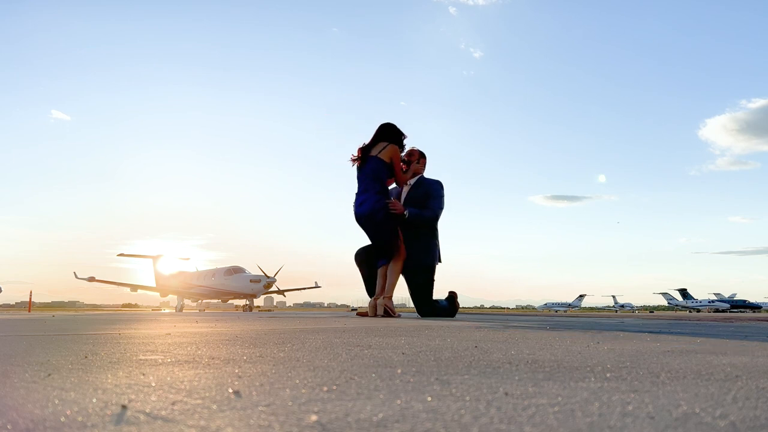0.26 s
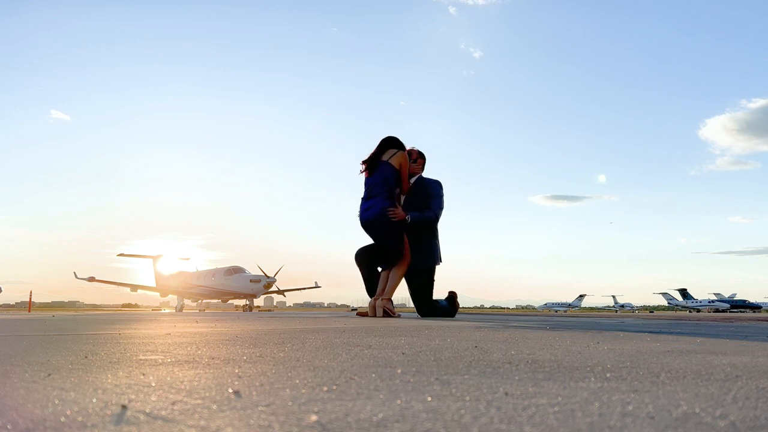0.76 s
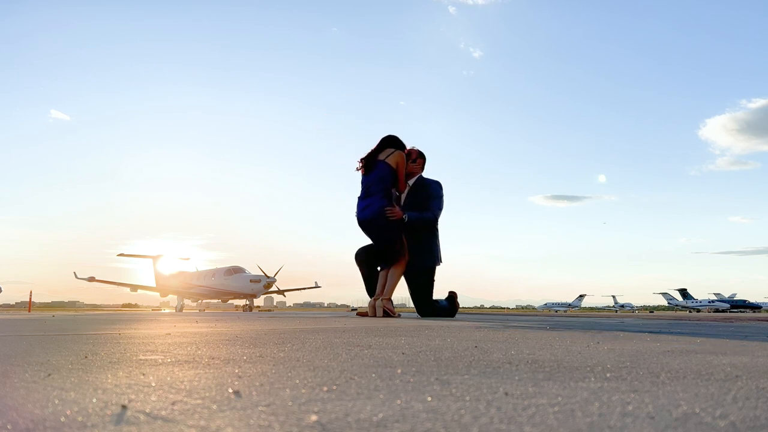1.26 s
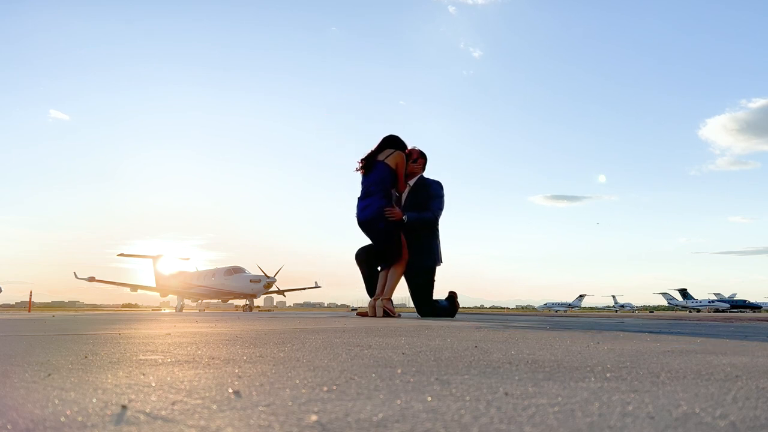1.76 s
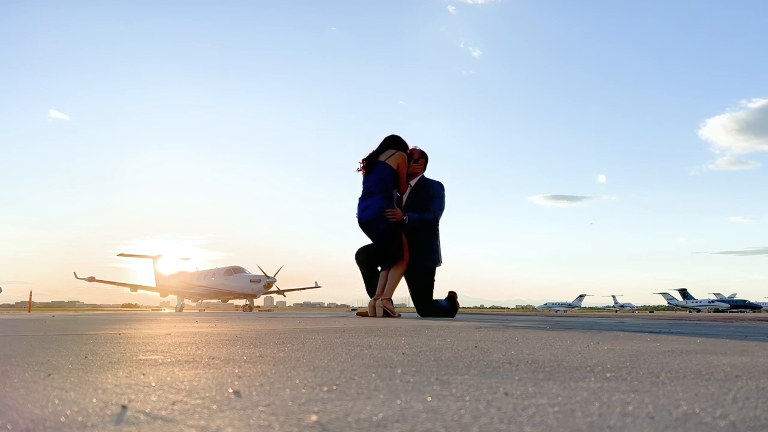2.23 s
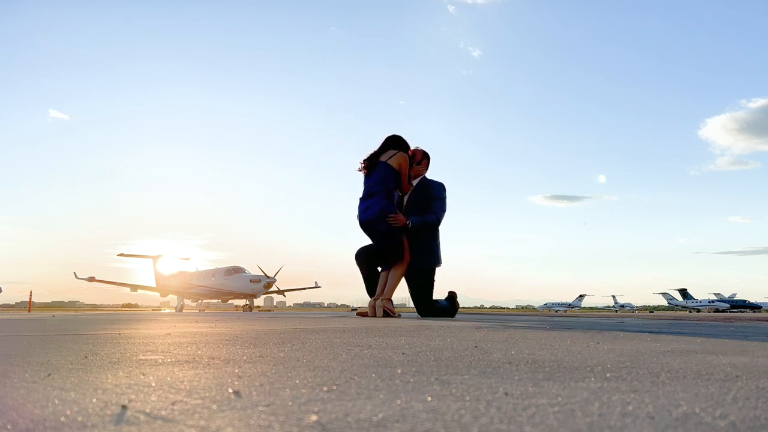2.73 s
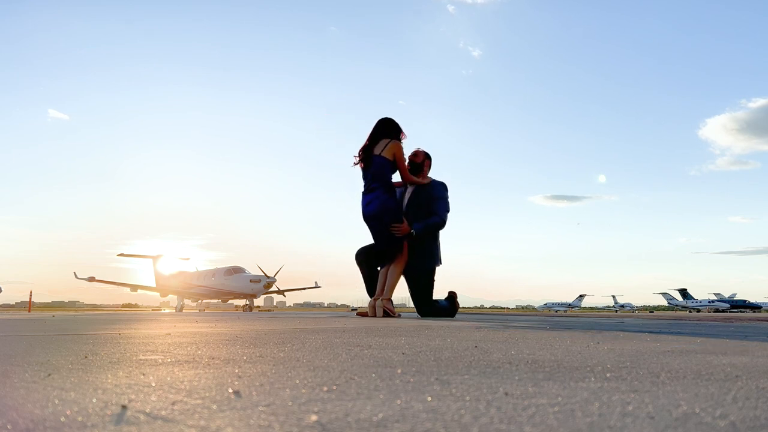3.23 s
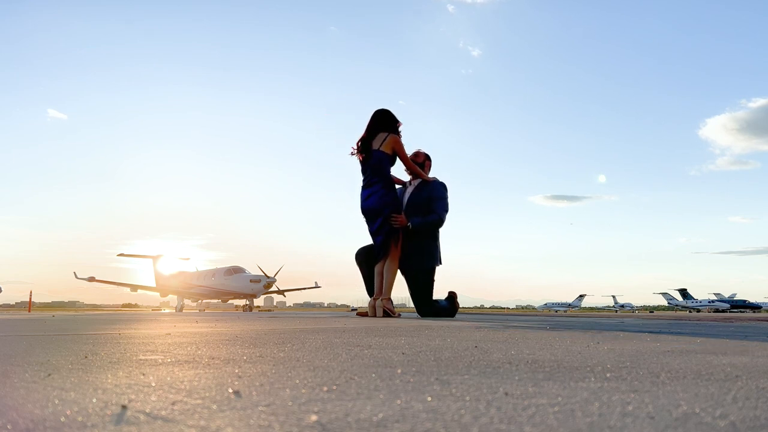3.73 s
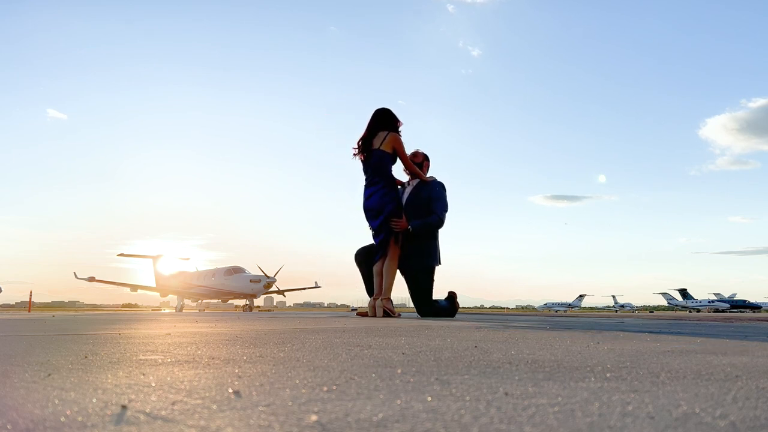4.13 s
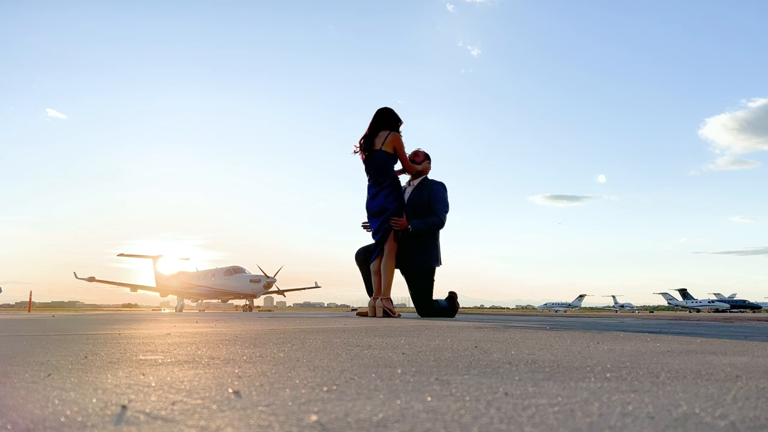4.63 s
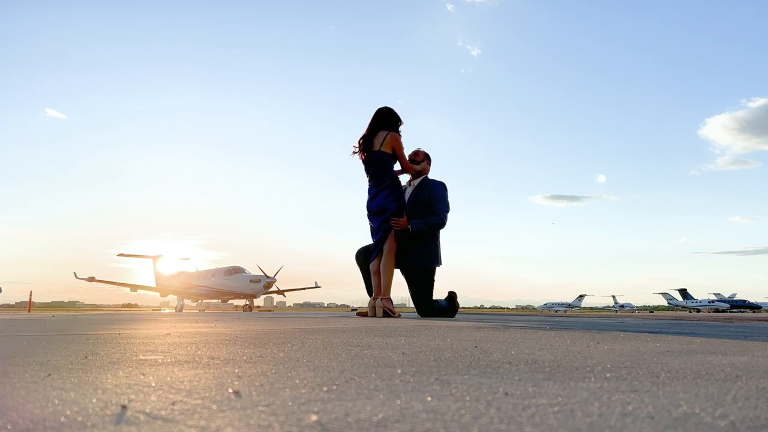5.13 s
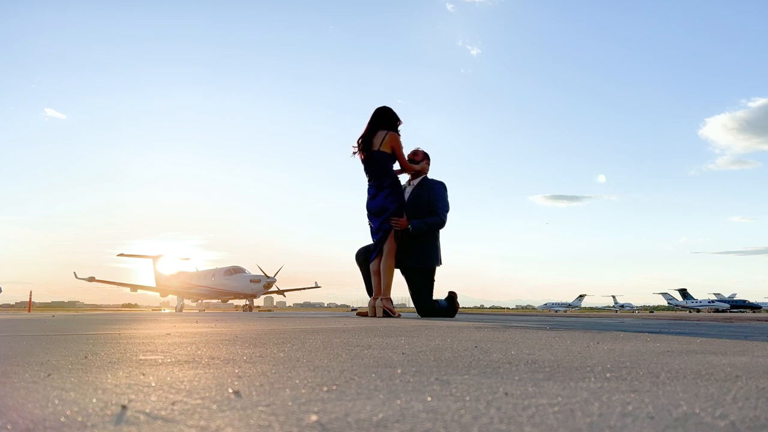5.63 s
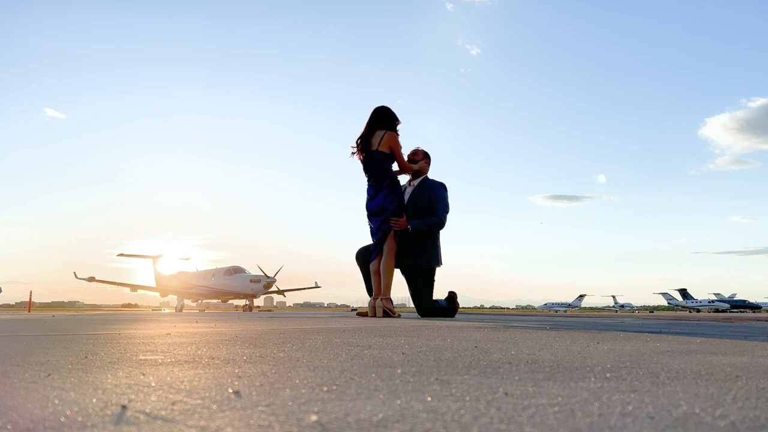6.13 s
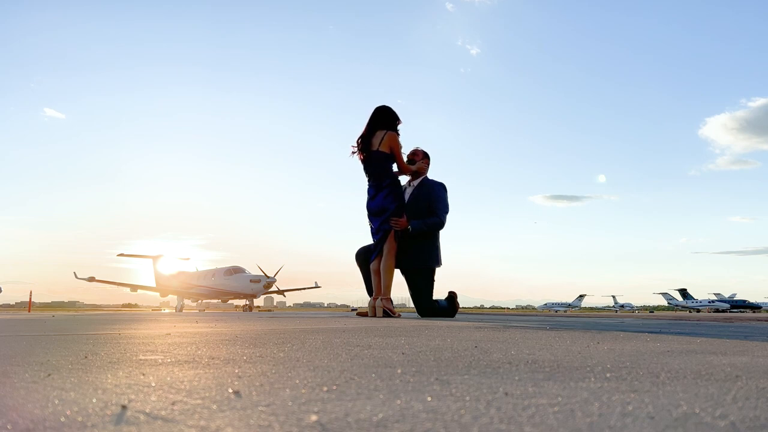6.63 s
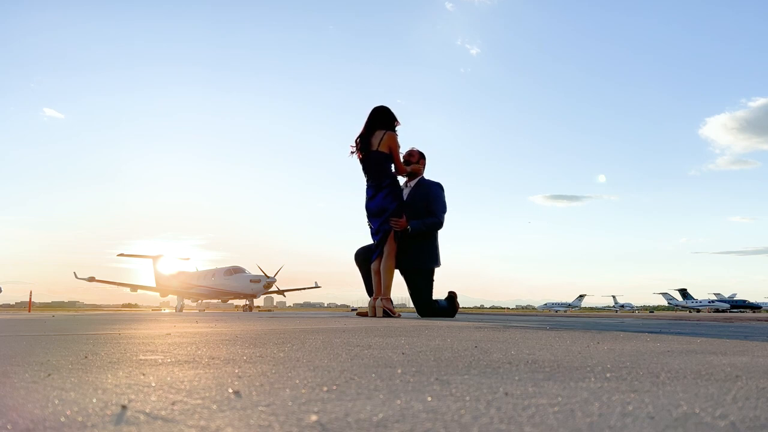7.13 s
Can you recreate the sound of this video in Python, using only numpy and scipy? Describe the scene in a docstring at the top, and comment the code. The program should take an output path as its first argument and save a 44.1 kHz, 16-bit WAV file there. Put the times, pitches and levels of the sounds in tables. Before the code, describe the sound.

A low pulsing drone of idling aircraft propellers on an open apron, with soft ticking, a faint bird and a couple kissing quietly.

```python
"""Propellers beating on an open apron

Two aircraft propellers idle; their blade rates drift apart, so the drone beats ever faster.
Under them lie turbulent exhaust roar and faint whines. A small bird chips, and a soft dry ticking
(perhaps a camera shutter in a burst) runs for two seconds. Close by, a couple kiss, clothes rustle
and shoes scuff, all as noise through resonances; wind bumps the ports, the recorder is nudged and knocked."""
import sys
import numpy as np
from scipy import signal
from scipy.fft import rfft, irfft, next_fast_len
from scipy.io import wavfile
from scipy.ndimage import uniform_filter1d, map_coordinates

SR = 44100
rng = np.random.default_rng(int(sys.argv[2]) if len(sys.argv) > 2 else 0)


def wav_record(signal):
    """Record a signal, one row per channel, as 16-bit PCM in the file named by sys.argv[1]."""
    frames = np.transpose(np.atleast_2d(signal))
    bounded = np.clip(frames, -1, 1)
    # unit amplitude maps onto the largest positive 16-bit level
    quanta = np.round(bounded * 32767).astype(np.int16)
    wavfile.write(sys.argv[1], SR, quanta)


N = 325899
T = np.arange(N) / SR
NEAR_LAG_S = .00026  # delay between the microphone's ports for lips and clothes


def undb(db):
    """Decibels to amplitude ratio."""
    return 10 ** (np.asarray(db) / 20)


def unit(x):
    """Normalisation to rms 1."""
    return x / np.sqrt(np.mean(x ** 2) + 1e-20)


def walk(rate_hz):
    """A smooth random process of rms 1: held random steps, averaged twice."""
    hold = max(int(SR / rate_hz), 2)
    steps = np.repeat(rng.standard_normal(N // hold + 1), hold)
    return unit(uniform_filter1d(uniform_filter1d(steps, hold), hold)[:N])


def curve(points):
    """Linear interpolation of rows (time [s], value, ...): one control for each value column."""
    times, *columns = np.transpose(points)
    return [np.interp(T, times, column) for column in columns]


def band(x, hz, width_hz):
    """A second-order resonance with gain 1 at its centre."""
    hz = min(hz, .44 * SR)
    return signal.lfilter(*signal.iirpeak(hz, hz / min(width_hz, SR / 3), fs=SR), x)


def dull(x, hz):
    """A fourth-order low-pass rolls off the treble."""
    return signal.sosfilt(signal.butter(4, min(hz, .44 * SR), fs=SR, output="sos"), x)


def colour(x, points):
    """Spectral shaping by rows (frequency [Hz], gain [dB])."""
    hz, db = np.transpose(points)
    size = next_fast_len(N + SR // 10)
    bins_hz = np.arange(size // 2 + 1) * SR / size + 1
    gain = undb(np.interp(np.log(bins_hz), np.log(hz), db))
    return irfft(rfft(x, size) * gain, size)[..., :N]


def coloured(points):
    """Gaussian noise of rms 1 with a shaped spectrum."""
    return unit(colour(rng.standard_normal(N), points))


def ports(x, pan_db, lag_s=.00034):
    """Direction as level and time differences: the left port is pan_db louder and lag_s later."""
    late = map_coordinates(x, [np.arange(len(x)) - lag_s * SR], order=3)
    return np.array([late * undb(pan_db / 2), x * undb(-pan_db / 2)])


def add(out, s, x):
    """Superposition of a short sound at time s."""
    i = int(s * SR)
    x = x[..., max(-i, 0):max(N - i, 0)]
    out[..., max(i, 0):max(i, 0) + x.shape[-1]] += x


def grains(length_s, spread_db, skew):
    """Friction noise: grains of uneven size under a swell that peaks early when skew is below 1."""
    progress = np.linspace(0, 1, int(np.clip(length_s, .01, 1) * SR))
    sizes = undb(spread_db * np.repeat(np.minimum(rng.exponential(size=SR // 20), 5), 20))
    return (rng.standard_normal(SR) * sizes)[:len(progress)] * np.sin(np.pi * progress ** skew)


def narrowband(points, spread_hz):
    """Random modulation in quadrature smears a gliding tone into a narrow band."""
    hz, db = curve(points)
    phase = 2 * np.pi * np.cumsum(hz) / SR
    return ports(undb(db) * (walk(spread_hz) * np.cos(phase) + walk(spread_hz) * np.sin(phase)), 0)


# a distant whine, and the thin one of a turbine: (time [s], frequency [Hz], level [dB])
DISTANT_WHINE = [(0, 493.3, -66), (.4, 504, -55.5), (.85, 521, -54.5), (1.4, 497, -61.5),
                 (2.5, 498.4, -66.5), (3.5, 491, -82)]
TURBINE_WHINE = [(0, 9770, -104), (2.5, 9570, -96), (7.39, 9600, -96)]
def whines():
    """Narrow-band noise is heard as pitch: a low whine swells and sinks, a turbine holds a high one."""
    return narrowband(DISTANT_WHINE, spread_hz=100) + narrowband(TURBINE_WHINE, spread_hz=260)


# two thin high swishes: (time [s], centre [Hz], level [dB])
SWISH_PATH = [(2.2, 11020, -115), (2.28, 11200, -85), (2.36, 12260, -83), (2.41, 11900, -83),
              (2.48, 13060, -89), (2.56, 11180, -85), (2.7, 11700, -87), (2.85, 11330, -115),
              (3.7, 11260, -115), (3.77, 11550, -88), (3.85, 12180, -82.5), (3.92, 10980, -84),
              (3.97, 11480, -79), (4.03, 11440, -115)]
def swishes():
    """Wide random modulation blurs a high tone into a hiss."""
    return narrowband(SWISH_PATH, spread_hz=2200)


# spectra of the direct roar and of the scattered roar and hiss: (frequency [Hz], relative density [dB])
DIRECT_SPECTRUM = [(20, -26), (40, -2.5), (60, 6.5), (110, 6), (170, -1.5), (260, -9.5), (400, -14.5),
                   (600, -20), (900, -17.5), (1300, -25.5), (2000, -46), (3300, -55), (6000, -54),
                   (15000, -67)]
DIFFUSE_SPECTRUM = [(20, -14), (60, -5), (150, 0.5), (300, -2), (500, -6.5), (900, -14), (1400, -28),
                    (2200, -42), (3300, -42), (5000, -45), (8000, -49.5), (15000, -60)]
# slow changes in the roar's treble: (time [s], gain [dB])
ROAR_TREBLE = [(0, 2.5), (1.2, 0), (3.3, 0), (3.9, -1.5), (4.6, 0.5), (5.4, 1.5), (5.9, -2.5), (7.39, -2.5)]
def exhaust_roar(direct_db=-42.5, diffuse_db=-49, flicker_db=.5, drift_db=1, treble_hz=400):
    """Turbulence arrives as a direct field, coherent at the ports, and a diffuse field, incoherent."""
    direct = ports(coloured(DIRECT_SPECTRUM) * undb(direct_db + flicker_db * walk(11)), pan_db=5.5)
    diffuse = undb(diffuse_db) * np.array([coloured(DIFFUSE_SPECTRUM), coloured(DIFFUSE_SPECTRUM)])
    roar = (direct + diffuse) * undb(drift_db * walk(1.996))
    bass = signal.sosfiltfilt(signal.butter(2, treble_hz, fs=SR, output="sos"), roar)
    return bass + (roar - bass) * undb(curve(ROAR_TREBLE)[0])


# waves of exhaust rush: (time [s], duration [s], level [dB], centre [Hz])
RUSH_WAVES = [(-.15, 0.41, -63, 1100), (0.201, 0.24, -54, 660), (1.699, 0.39, -56.5, 712),
              (2.518, .35, -55, 810), (2.95, .65, -66.5, 1290), (4.249, 0.5, -62.5, 1130),
              (4.849, 0.98, -55, 669), (5.39, .27, -52, 763), (6.247, 0.57, -63, 1100),
              (7.018, 0.48, -53, 660), (7.051, .6, -66.5, 1190)]
def exhaust_swells(relative_width=.6):
    """Propagation in moving air: the breeze carries bands of the exhaust's rush over in waves."""
    out = np.zeros(N)
    for s, length, db, hz in RUSH_WAVES:
        swell = np.hanning(int(length * SR))
        rush = band(rng.standard_normal(2 * SR), hz, relative_width * hz)
        rush = dull(band(rush, hz, relative_width * hz), 1.5 * hz)
        add(out, s, undb(db) * swell * unit(rush)[-len(swell):])
    return ports(out, pan_db=2, lag_s=.00045)


# phrases of four notes: (time [s], first interval between notes [s], relative level [dB])
BIRD_PHRASES = [(.690, .03, -65), (.850, 0.042, -57.5), (1.293, .03, -64), (1.886, .026, -66),
                (2.152, .042, -58), (2.612, 0.026, -67.5), (3.232, .043, -57), (3.352, 0.03, -66.5),
                (4.36, .029, -71), (4.458, .043, -64), (5.566, 0.021, -69.5), (6.22, 0.042, -61),
                (6.559, 0.027, -68), (7.283, 0.024, -70)]
def bird(note_s=.027, slowing_s=.0046, roughness=.25, distance_db=-3.2, echo_db=-9, echo_s=.04):
    """Frequency-modulated whistles hold their pitch, then drop; scattering adds a short tail."""
    song = np.zeros(N)
    progress = np.linspace(0, 1, int(note_s * SR))
    for s, gap_s, db in BIRD_PHRASES:
        # slower phrases start lower and fall further; quicker ones gain level
        phrase_hz, fall_hz = 4850 - 5200 * gap_s, 13500 * gap_s
        phrase_db = db + 130 * (.04 - gap_s)
        for k in range(4):
            first = k == 0  # the opening note is lower and softer
            top_hz = (phrase_hz - 130 * first) * (1 + .003 * rng.standard_normal())
            pitch = top_hz - fall_hz * progress ** 2
            note = np.sin(np.pi * progress) * np.sin(2 * np.pi * np.cumsum(pitch) / SR)
            start = s + k * gap_s + slowing_s * k * (k - 1) / 2
            add(song, start, undb(phrase_db - 9 * first) * note)
    song = undb(distance_db) * song * (1 + roughness * walk(550))
    tails = rng.standard_normal((2, SR // 5)) * np.exp(-T[:SR // 5] / echo_s)
    echo = np.array([signal.fftconvolve(song, tail / np.linalg.norm(tail))[:N] for tail in tails])
    return ports(song, pan_db=7, lag_s=.00027) + undb(echo_db) * echo


# puffs of wind: (time [s], duration [s], level [dB], centre [Hz])
WIND_PUFFS = [(3.38, 0.3, -43.5, 45), (3.661, .3, -44, 48.2), (3.95, 0.31, -46, 109), (4.167, .25, -45, 55),
              (4.552, .3, -41.5, 50)]
def wind(relative_width=.38, incoherent_db=-9):
    """Low pressure fluctuations strike the ports, only partly coherent between the two."""
    out = np.zeros((2, N))
    for s, length, db, hz in WIND_PUFFS:
        swell = np.hanning(int(length * SR))
        rumbles = [band(band(rng.standard_normal(SR), hz, relative_width * hz), hz, hz) for _ in range(3)]
        common, left, right = (unit(rumble[-len(swell):] * swell) for rumble in rumbles)
        add(out, s, undb(db) * (common + undb(incoherent_db) * np.array([left, right])))
    return out


# nudges to the recorder: (time of peak [s], duration [s], peak level [dB], frequency [Hz])
NUDGES = [(3.394, 0.036, -18.5, 81), (3.602, 0.077, -32, 55), (4.717, 0.055, -31, 70),
          (4.88, 0.04, -23, 68)]
def thumps():
    """Structure-borne sound: the recorder's body rocks for a few low cycles."""
    out = np.zeros(N)
    for s, length, db, hz in NUDGES:
        swell = np.hanning(int(length * SR))
        rocking = np.cos(2 * np.pi * hz * (T[:len(swell)] - length / 2))
        add(out, s - length / 2, undb(db) * swell * rocking)
    return out


# modes of the recorder's body: (frequency [Hz], decay [s], relative level [dB])
BODY_MODES = [(660, 0.0016, -26.5), (1565, 0.00092, -24), (2230, 0.00038, -31), (4100, 0.00083, -34.5),
              (6000, 0.00076, -39)]
def knock(time_s=4.9, pan_db=4):
    """A tap excites heavily damped modes and reaches both ports at once through the body."""
    out, t = np.zeros(N), T[:SR // 50]
    for hz, decay_s, db in BODY_MODES:
        envelope = t / decay_s * np.exp(1 - 2 * t / decay_s)
        add(out, time_s, undb(db) * envelope * np.sin(2 * np.pi * hz * t))
    return out * undb(np.array([[pan_db], [-pan_db]]) / 2)


# cloth rubbing: (time [s], duration [s], level [dB], centre [Hz])
CLOTH_RUBS = [(0, 0.15, -70.5, 1400), (0.299, 0.11, -65, 1500), (0.426, 0.099, -80, 5000),
              (2.444, 0.1, -77, 6500), (2.721, 0.18, -72, 3000), (2.86, 0.74, -76, 2620),
              (3.06, 0.28, -75.5, 5000), (3.25, 0.35, -77, 3380), (3.468, 0.18, -73, 3600),
              (3.758, 0.37, -76, 3660), (3.917, 0.069, -63, 3700), (4.05, 0.35, -71, 3600),
              (4.34, 0.42, -78.5, 3800), (4.856, 0.12, -67.5, 3970), (4.967, 0.33, -80, 4200),
              (5.352, 0.35, -78.5, 4940), (5.996, 0.058, -71.5, 4500), (6.086, 0.33, -76, 3500),
              (6.389, .16, -75.5, 3800), (6.86, 0.051, -76, 3500), (7.04, 0.058, -77, 3500),
              (7.313, 0.16, -77.5, 6000)]
def clothes(relative_width=2.6, fold_hz=2200, fold_db=-6):
    """Stick-slip friction: fibres catch in fine dense grains, over the duller fold of the cloth."""
    out = np.zeros(N)
    for s, length, db, hz in CLOTH_RUBS:
        slip = grains(length, spread_db=3.5, skew=.58)
        width_hz = relative_width * hz
        fibres = band(band(slip, hz, width_hz), hz, min(width_hz, 9000))
        fold = undb(fold_db) * band(slip, fold_hz, fold_hz / 2)
        add(out, s, undb(db) * unit(dull(fibres + fold, 2.16 * hz)))
    return ports(out, pan_db=4, lag_s=NEAR_LAG_S)


# shoes on grit: (time [s], duration [s], level [dB], centre [Hz], spread of grain sizes [dB])
SHOE_SCUFFS = [(0.297, 0.11, -58, 9400, 2.5), (6.087, 0.075, -74, 11500, 5), (6.222, 0.045, -62, 14500, 5),
               (6.379, 0.14, -76, 10500, 6), (6.855, 0.06, -74, 9360, 3.5), (7.036, 0.053, -73, 11000, 3)]
def scuffs(grit_width_hz=8000, sole_hz=2300, sole_db=-5, heel_hz=5700, heel_db=-8, shoe_width_hz=600):
    """Grit cracks under a shoe in coarse grains that excite resonances of its sole and heel."""
    out = np.zeros(N)
    for s, length, db, hz, spread_db in SHOE_SCUFFS:
        grit = grains(length, spread_db, skew=.51)
        sole = undb(sole_db) * band(grit, sole_hz, shoe_width_hz)
        heel = undb(heel_db) * band(grit, heel_hz, shoe_width_hz)
        add(out, s, undb(db) * unit(band(grit, hz, grit_width_hz) + sole + heel))
    return ports(out, pan_db=2)


# slips of lips and soles: (time [s], duration [s], level [dB], resonance [Hz])
SLIPS = [(2.722, 0.017, -54, 2660), (2.725, .028, -64, 6440), (2.796, .014, -54.5, 4000),
         (6.11, .02, -68, 11000), (6.222, 0.042, -62.5, 11940), (6.38, 0.12, -78, 8600),
         (6.43, .04, -69, 11300), (6.431, .03, -68.5, 4800), (6.434, .04, -72.5, 2500),
         (6.45, 0.054, -79, 11800)]
def squeaks(width_hz=700):
    """Friction in a short slip drives one narrow resonance."""
    out = np.zeros(N)
    for s, length, db, hz in SLIPS:
        slip = grains(length, spread_db=3, skew=.45)
        add(out, s, undb(db) * unit(band(band(slip, hz, width_hz), hz, width_hz)))
    return ports(out, pan_db=2)


# clicks of lips, cloth and grit: (time [s], peak level [dB], centre [Hz], pan [dB], decay [s])
NEAR_CLICKS = [(.300, -33.5, 8400, -4, 0.0045), (.300, -46.5, 2100, -1, .004),
               (0.312, -35, 10500, 1, 0.0023), (.346, -43, 1750, 10.5, 0.0047),
               (.441, -35.5, 586, 2, 0.004), (.443, -58.5, 4770, 2, .003), (2.722, -48, 3700, 6, .0015),
               (2.801, -47.5, 3000, 2, 0.0011), (2.839, -59, 11400, 1, .002), (3.003, -55, 3000, 1, .0015),
               (3.209, -45.5, 7960, 7, 0.0017), (3.218, -48, 8500, 8, .002), (3.232, -56, 8000, 9, 0.0022),
               (3.357, -60, 7000, 6, .001), (3.386, -54, 6000, 4, 0.0013), (3.485, -51, 6000, 9, .002),
               (3.496, -46, 5000, 6, 0.0008), (3.497, -49.5, 1550, 2, 0.0049),
               (4.937, -50.5, 4000, 2, 0.0023), (5.229, -51, 3280, 7, 0.0019),
               (5.463, -53, 7000, 6, 0.0018), (5.486, -57, 6470, 11, 0.0026),
               (5.598, -56.5, 4050, 9, 0.007), (6.091, -52, 10000, 0, 0.00077), (6.099, -49, 4170, 6, .003),
               (6.143, -60, 6000, 2, 0.0012), (6.2, -56, 11000, 0, 0.00096), (6.265, -50, 3600, 4, 0.0023),
               (6.858, -54, 5000, 4, 0.0017), (7.046, -56, 3600, 0, 0.0027), (7.255, -59, 4500, 3, 0.0057),
               (7.333, -64, 8000, 4, .003), (7.367, -61, 8000, 4, .003)]
def clicks(relative_width=.58, rise_s=.00051, tail_db=-30, tail_s=.068):
    """Transient excitation: each brief burst rings one broad resonance and leaves a faint tail."""
    out, t = np.zeros((2, N)), T[:SR // 10]
    for s, db, hz, pan_db, decay_s in NEAR_CLICKS:
        envelope = (1 - np.exp(-t / rise_s)) * (np.exp(-t / decay_s) + undb(tail_db) * np.exp(-t / tail_s))
        ring = band(rng.standard_normal(len(t)) * envelope, hz, relative_width * hz)
        click = dull(band(ring, hz, 2 * relative_width * hz), 2.2 * hz)
        add(out, s, ports(undb(db) * click / np.abs(click).max(), pan_db))
    return out


# snaps of a lingering kiss: (time [s], peak level [dB])
FILM_SNAPS = [(4.060, -50), (4.071, -47), (4.078, -47), (4.106, -47), (4.121, -39.5), (4.125, -43),
              (4.137, -45), (4.148, -42), (4.187, -42), (4.199, -52), (4.211, -55), (4.231, -54),
              (4.238, -44), (4.256, -51), (4.268, -51), (4.284, -54), (4.360, -57)]
def kiss_crackle(snap_hz=6200, width_hz=5000, mouth_hz=2300, mouth_db=1, top_hz=9500, decay_s=.0015):
    """Tiny films of moisture rupture one after another and excite the mouth's cavity resonance."""
    out, t = np.zeros(N), T[:SR // 100]
    for s, db in FILM_SNAPS:
        burst = rng.standard_normal(len(t)) * np.exp(-t / decay_s)
        mouth = undb(mouth_db) * band(burst, mouth_hz, mouth_hz / 4)
        snap = dull(band(burst, snap_hz, width_hz) + mouth, top_hz)
        add(out, s, undb(db) * snap / np.abs(snap).max())
    return ports(out, pan_db=8, lag_s=NEAR_LAG_S)


# kisses: (time [s], duration [s], level [dB], mouth resonance [Hz], lip flutter [Hz], pan [dB],
# cheek cavity relative to mouth [dB])
LIP_SMACKS = [(2.72, 0.013, -52.5, 2600, 806, 3, -21), (2.796, 0.011, -54.5, 2500, 660, 6, -18),
              (3.923, 0.018, -49.5, 5400, 979, 6.5, -3.5), (5.996, 0.018, -62, 7600, 348, 4, 4)]
def kisses(relative_width=.78, jitter=.53, puff_cycles=.36, cheek_hz=1280, cheek_width_hz=260):
    """Source and filter: pursed lips flutter in uneven puffs that ring the mouth and hollow cheeks."""
    out = np.zeros((2, N))
    for s, length, db, hz, flutter_hz, pan_db, cheek_db in LIP_SMACKS:
        n, width_hz = int(length * SR), relative_width * hz
        swell = np.sqrt(np.abs(np.sin(np.pi * np.linspace(0, 1, n))))
        cycle = np.cumsum(flutter_hz * (1 + jitter * walk(500)[:n])) / SR % 1
        puffs = np.exp(-cycle / puff_cycles) * rng.standard_normal(n) * swell
        formants = band(puffs, hz, width_hz) + undb(-1) * band(puffs, 1.6 * hz, width_hz)
        mouth = dull(band(formants, hz, width_hz), 1.85 * hz)
        add(out, s, ports(undb(db) * unit(mouth), pan_db, NEAR_LAG_S))
        cheeks = band(np.pad(puffs, (0, n)), cheek_hz, cheek_width_hz)
        cheeks = band(cheeks, cheek_hz, cheek_width_hz)
        add(out, s, ports(undb(db + cheek_db) * unit(cheeks), pan_db / 2))
    return out


# a snap, its return and a faint double tick: (time in cycle [s], relative level [dB])
CYCLE_IMPACTS = [(0, 1), (.076, -4.5), (.109, -8), (.119, -4.5)]
# resonances of the ticking mechanism: (frequency [Hz], bandwidth [Hz], gain [dB])
MECHANISM_MODES = [(1620, 400, 4.5), (2100, 210, 7.5), (6300, 800, 0), (8600, 1100, -1)]
def ticking(start_s=.6222, period_s=.1476, cycles=15, drive_db=-56, scatter_db=2, rise_s=.001, decay_s=.005):
    """Periodic impacts: every cycle of soft snaps excites the same few broad resonances."""
    impacts, t = np.zeros(N), T[:SR // 25]
    envelope = (1 - np.exp(-t / rise_s)) * np.exp(-t / decay_s)
    for cycle in range(cycles):
        for lag_s, db in CYCLE_IMPACTS:
            size = undb(drive_db + db + scatter_db * rng.standard_normal())
            add(impacts, start_s + cycle * period_s + lag_s, size * envelope * rng.standard_normal(len(t)))
    ringing = sum(undb(db) * band(impacts, hz, width_hz) for hz, width_hz, db in MECHANISM_MODES)
    return ports(ringing, pan_db=3)


def propeller(blade_rate, group_levels, harmonics, flutter_db, roughness=.035, jitter_rad=.021):
    """Blade passage radiates a harmonic series; moving air modulates the upper harmonics most."""
    (hz,) = curve(blade_rate)
    phase = 2 * np.pi * np.cumsum(hz) / SR
    levels = [group_db + db for group_db, group in zip(curve(group_levels), harmonics) for db in group]
    out = np.zeros(N)
    for k, db in enumerate(levels, 1):
        amplitude = np.sqrt(2) * undb(db + flutter_db * k * walk(4)) * (1 + roughness * k * walk(25))
        out += amplitude * np.sin(k * phase + jitter_rad * k * walk(10))
    return out


# one propeller runs down while the other runs up: (time [s], blade rate [Hz])
SLOW_BLADE_RATE = [(0, 74), (2, 73.7), (4, 73.1), (4.8, 71.9), (6.4, 70.7), (7.39, 69.7)]
FAST_BLADE_RATE = [(0, 76.91), (.6, 76.39), (1.6, 76.6), (2.3, 77.21), (2.9, 76.93), (4, 77.89),
                   (4.5, 77.71), (5.1, 78.73), (6.2, 78.81), (7.39, 79.19)]
# harmonic groups of the slow propeller: (time [s], thrum [dB], octave hum [dB], buzz [dB], rasp [dB])
SLOW_GROUPS = [(0, -45.5, -40, -46, -48.5), (.6, -37.5, -46.5, -51, -54.5), (1.05, -42.5, -43, -55, -56.5),
               (1.45, -38, -42, -49, -57), (1.65, -52.5, -38.5, -48, -53.5),
               (1.9, -38.5, -41.5, -49.5, -54.5), (2.3, -40.5, -42.5, -51.5, -59),
               (2.6, -38, -42, -48.5, -55.5), (3.1, -35.5, -37.5, -49, -54), (3.55, -36.5, -41, -51, -57),
               (4.15, -42, -44.5, -55.5, -60.5), (4.65, -34, -42.5, -47, -56),
               (5.05, -40.5, -44, -48.5, -55.5), (5.5, -36, -36.5, -46.5, -55),
               (6.15, -34, -35.5, -59, -62.5), (6.55, -34.5, -37.5, -52, -56.5),
               (7.39, -34.5, -37, -50, -65)]
# harmonic groups of the fast propeller: (time [s], thrum [dB], buzz [dB])
FAST_GROUPS = [(0, -38.5, -60), (.55, -44.5, -62), (0.799, -33, -58), (1.0, -39.5, -54), (1.45, -37.5, -63),
               (1.65, -50, -58), (1.85, -35.5, -64.5), (2.3, -31.5, -67), (2.55, -37, -60), (2.9, -38, -56),
               (3.5, -37, -53), (4.05, -41, -52), (4.35, -36, -51), (4.699, -34, -49), (7.39, -36.5, -47)]
# harmonics from the first up, one row for each group: (level relative to the group [dB], ...)
SLOW_HARMONICS = [
    [2.5],
    [-1.5],
    [2.5, -1.5],
    [-2.5, -11, -14],
]
FAST_HARMONICS = [
    [2],
    [1, -4.5, -15],
]
def beating_propellers():
    """Interference: two drones beat at the difference of their blade rates, from about 3 to 9 Hz."""
    slow = propeller(SLOW_BLADE_RATE, SLOW_GROUPS, SLOW_HARMONICS, flutter_db=.4564)
    fast = propeller(FAST_BLADE_RATE, FAST_GROUPS, FAST_HARMONICS, flutter_db=.5)
    return ports(slow + fast, pan_db=.7)


def scene():
    """Superposition of far sources, near sources and disturbances at the recorder itself."""
    far = beating_propellers() + exhaust_roar() + exhaust_swells() + whines() + bird()
    near = ticking() + clicks() + kisses() + kiss_crackle() + squeaks() + clothes() + scuffs() + swishes()
    return far + near + knock() + thumps() + wind()


# frequency response of the microphone: (frequency [Hz], gain [dB])
MIC_RESPONSE = [(1200, -2), (2200, 4.5), (2700, 0.5), (3400, -4), (4500, 0), (6300, -0.5), (7200, -2.5),
                (8500, -2), (9500, -3.5), (10200, -7.5), (11400, -2), (12900, -2), (13900, -8.5),
                (15100, 1.5)]
def record(dry, fade_s=.006, top_hz=16000):
    """Linear filtering: the microphone colours the treble and the recorder cuts the top; the sound fades in and
    out over a few milliseconds at the ends."""
    fade = np.clip(np.minimum(T, T[-1] - T) / fade_s, 0, 1)
    lowpass = signal.ellip(8, .2, 70, top_hz, fs=SR, output="sos")
    return signal.sosfilt(lowpass, colour(dry * fade, MIC_RESPONSE))


dry = scene()
out = record(dry)
wav_record(out)
```